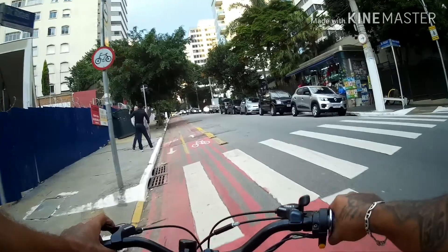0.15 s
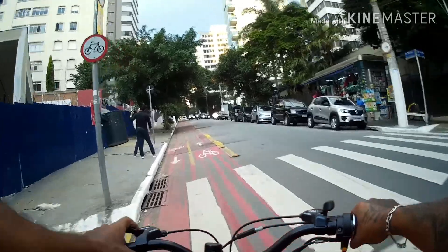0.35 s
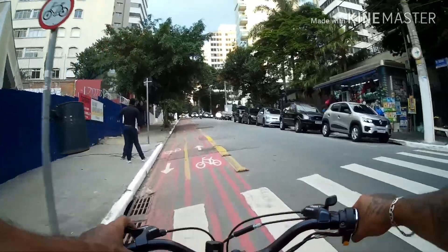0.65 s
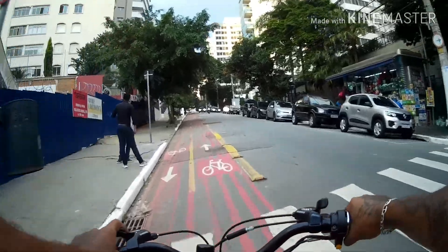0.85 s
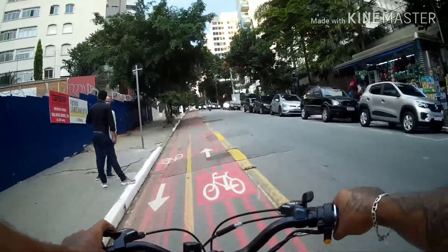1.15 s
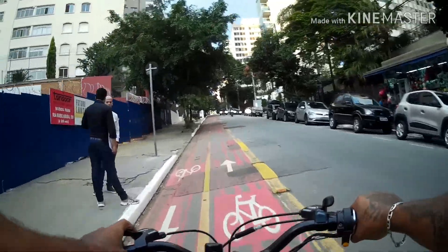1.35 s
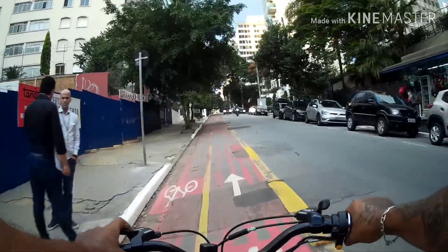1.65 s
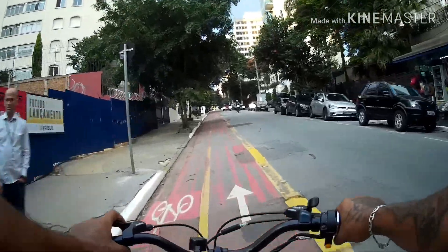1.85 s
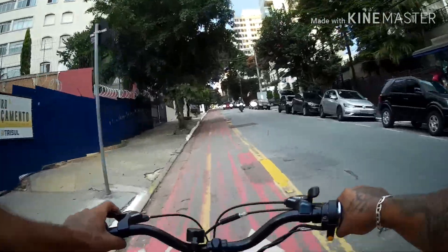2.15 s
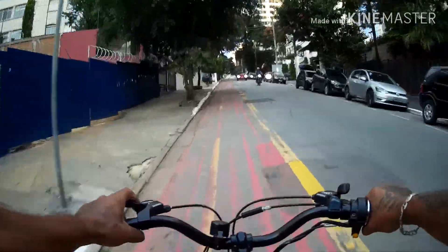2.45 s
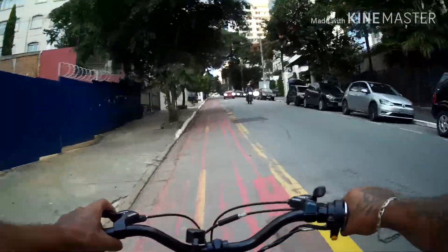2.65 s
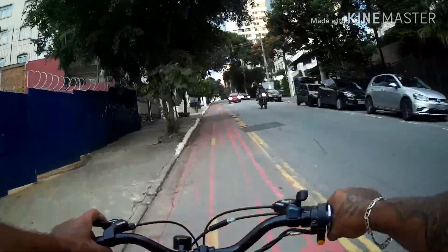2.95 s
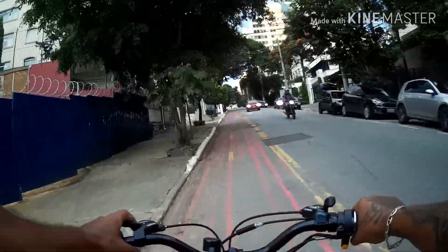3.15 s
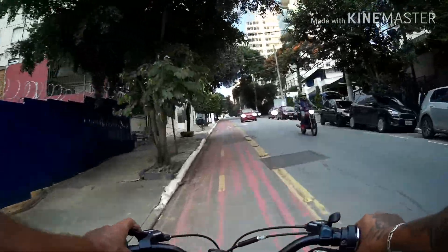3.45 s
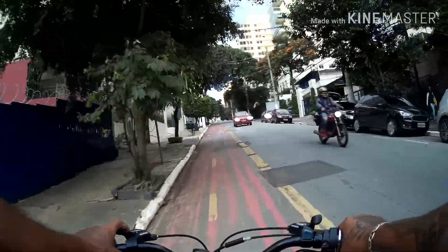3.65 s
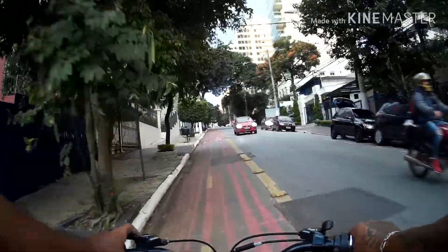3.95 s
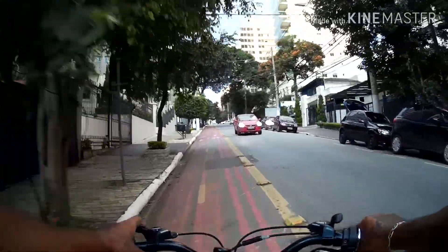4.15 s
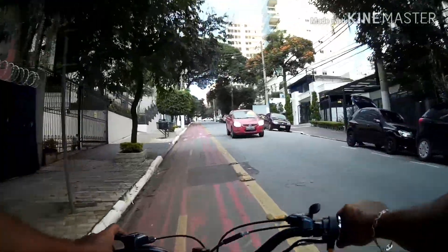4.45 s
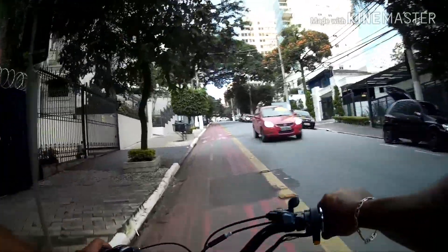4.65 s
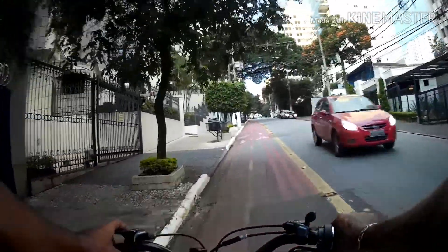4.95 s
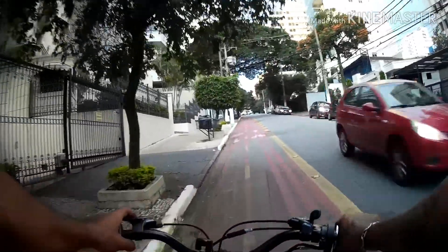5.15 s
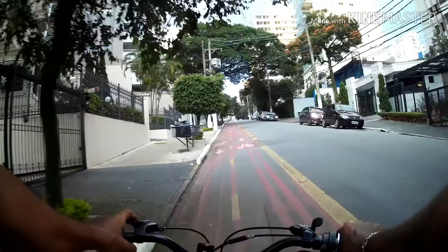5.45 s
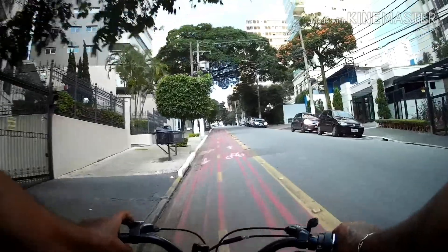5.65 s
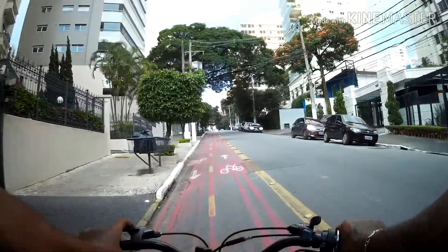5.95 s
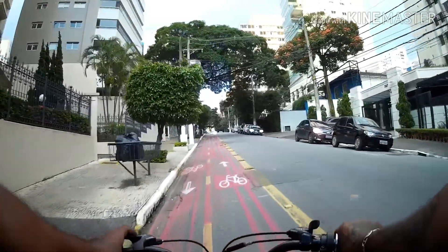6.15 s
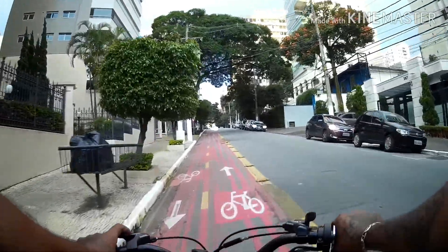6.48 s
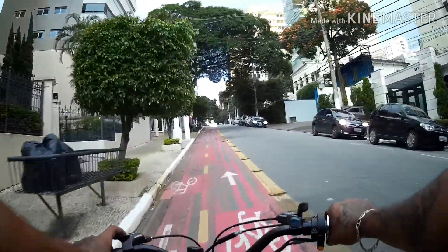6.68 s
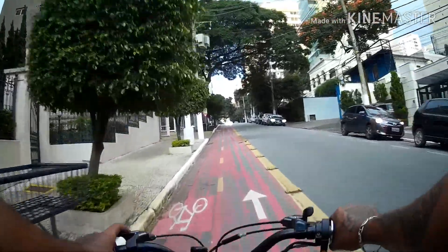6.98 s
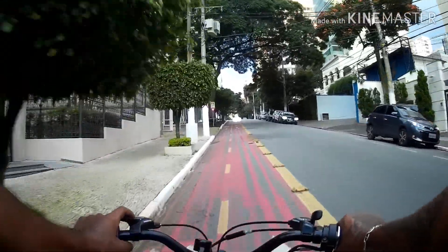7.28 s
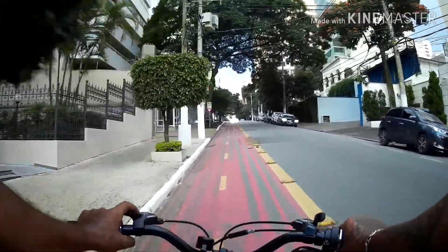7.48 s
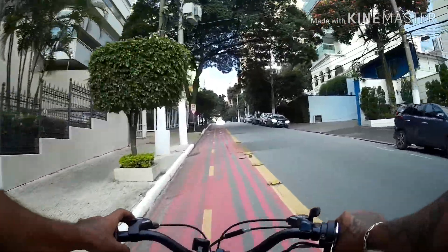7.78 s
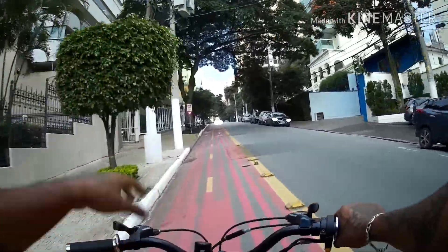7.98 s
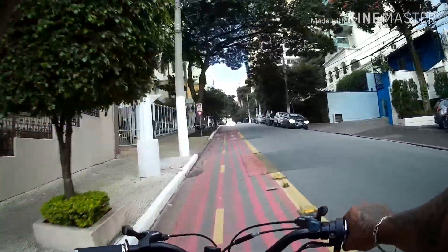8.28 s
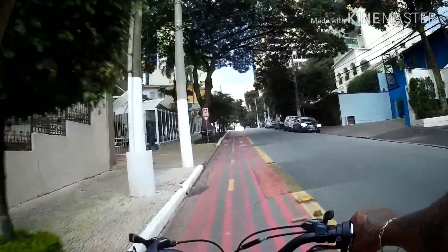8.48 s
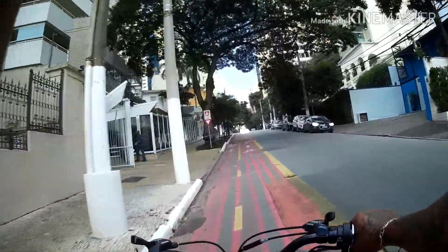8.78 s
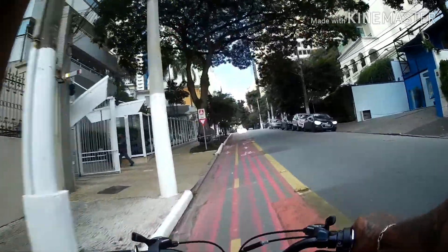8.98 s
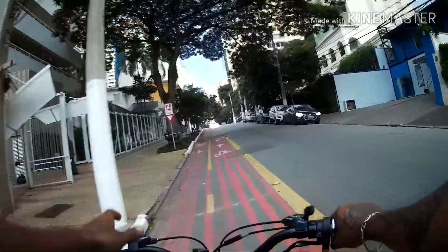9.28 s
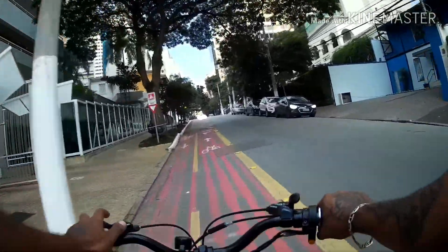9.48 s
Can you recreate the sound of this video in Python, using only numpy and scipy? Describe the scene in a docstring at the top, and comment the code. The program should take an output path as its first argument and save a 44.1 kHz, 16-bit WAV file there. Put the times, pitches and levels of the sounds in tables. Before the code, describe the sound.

A small four-stroke engine on a bicycle putters, gathers speed and settles into a rattling drone as a motorcycle and then a car pass.

```python
"""A small four-stroke engine drives a bicycle along a city street, heard from a camera on the rider.
It sets out slowly and gathers speed: each cycle pushes air, rings the muffler and clatters the valves.
All along the drive rasps, loose parts rattle, and tyres and air rumble; early on a part hums briefly.
Then a motorcycle comes by the other way, its exhaust falling in pitch, and after it a car.
By then the engine is cruising, and it runs on to the end."""
import sys
import numpy as np
from scipy import signal
from scipy.fft import rfft, irfft
from scipy.io import wavfile
from scipy.ndimage import uniform_filter1d

SR = 44100
rng = np.random.default_rng(int(sys.argv[2]) if len(sys.argv) > 2 else 0)


def put_to_file(sound):
    """Save the sound as 16-bit audio at rate SR, in the file named by the first command-line argument."""
    columns = np.atleast_2d(sound).T  # one column per channel
    safe = np.clip(columns, -1, 1)
    whole_steps = np.round(safe * 32767)
    wavfile.write(sys.argv[1], SR, whole_steps.astype(np.int16))


N = 424241
TIME = np.arange(N) / SR  # seconds
SLOW_HZ, CRUISE_HZ = 30.9, 36.56  # firings per second at the start and at cruise
CRUISE_DB = -29  # engine effort at cruise


def amp(db):
    """Decibels to gain."""
    return 10 ** (np.asarray(db) / 20)


def evened(x):
    """Scales to rms 1."""
    return x / np.sqrt(np.mean(x ** 2) + 1e-20)


def noise():
    """White noise for the whole scene."""
    return rng.standard_normal(N)


def curves(rows):
    """Each column of a time table, joined by straight lines."""
    s, *columns = np.transpose(rows)
    return [np.interp(TIME, s, column) for column in columns]


def wander(rate_hz):
    """Slow random drift of rms 1, with little movement faster than rate_hz."""
    count = 2048  # points of the drift, made at audio rate and then stretched over the scene
    hz = np.fft.rfftfreq(N, 1 / SR)[:count // 2 + 1]
    lowpass = 1 / (1 + (hz / rate_hz) ** 4)
    slow = irfft(rfft(rng.standard_normal(count)) * lowpass)
    return evened(np.interp(np.linspace(0, count - 1, N), np.arange(count), slow))


def colour(x, points, size=8192):
    """Passes x through a body with this spectrum, which rings only after it is struck; rms 1."""
    f, db = np.transpose(points)
    hz = abs(np.fft.fftfreq(size, 1 / SR))
    log_gain = np.log(amp(np.interp(np.log(hz + 1), np.log(f + 1), db)))
    # minimum phase: the phase follows from the gain
    spectrum = np.exp(np.conj(signal.hilbert(log_gain)))
    ring = np.fft.ifft(spectrum).real[:size // 2]
    return evened(signal.oaconvolve(x, ring)[:N])


def resonate(x, hz, width_hz):
    """One ringing mode, scaled to rms 1."""
    pole = np.exp((2j * np.pi * hz - np.pi * width_hz) / SR)
    return evened(signal.lfilter([1], [1, -pole], x).real)


def per_cycle(turns, spread_db):
    """A random gain that holds for one engine cycle."""
    cycle = np.floor(turns - np.floor(turns[0])).astype(int)
    return amp(spread_db * rng.standard_normal(1024))[cycle % 1024]


def burst(turns, length):
    """An envelope that jumps once a cycle and dies away; length in cycles."""
    return np.exp(-(turns % 1) / length)


def teeth(turns, alike, count=1200):
    """The same teeth meet in every cycle, so part of the grain repeats."""
    tooth = (turns % 1 * count).astype(int)
    same = rng.standard_normal(count)[tooth]
    return np.sqrt(alike) * same + np.sqrt(1 - alike) * noise()


def orders(table, load, waver_db):
    """Each order with its peak gain, which shifts with engine speed and wavers."""
    for k, *db in table:
        level_db = np.interp(load, [0, .6, 1], db) + waver_db * wander(rate_hz=13.5)
        yield round(k), np.sqrt(2) * amp(level_db)


def follow(effort_db, speed, cruise_db, per_db, per_hz, unsteady_db):
    """Gain of one engine part: it follows effort and speed, and is never quite steady."""
    from_effort = per_db * (effort_db - CRUISE_DB)
    from_speed = per_hz * (speed - CRUISE_HZ)
    return amp(cruise_db + from_effort + from_speed + unsteady_db * wander(rate_hz=14.0))


def bark(turns, speed, load, ring_hz=510, half_width_hz=85):
    """Each firing rings the muffler for a few milliseconds, sweeping quickly up, with weaker pulses between."""
    # orders that ring in the muffler:
    # (order, level when slow [dB], level midway [dB], level at cruise [dB])
    bark_orders = [(11, -20, -13, -14), (12, -8, -15, -14), (13, -7, -4, -4), (14, -19, -6, -5),
                   (15, -8, -7, -17), (16, -6, -7, -12), (17, -9, -11, -11), (18, -10, -16, -16),
                   (19, -13, -17, -12.5), (20, -18, -20, -19), (21, -18, -20, -22), (22, -19, -17, -25),
                   (23, -25, -21, -31), (25, -19, -24, -31)]
    turns = turns + .001 * wander(rate_hz=25)  # slightly uneven timing
    out = np.zeros(N)
    for k, gain in orders(bark_orders, load, waver_db=.5):
        detune = (k * speed - ring_hz) / half_width_hz
        # the phase of a resonance, with the orders below it leaving the pipe well ahead
        lag = np.arctan(detune) + np.where(detune < 0, .5, .16) * detune ** 2
        lag += .6 * np.sin(2 * np.pi * k * .36)  # the pulses between
        out -= gain * np.cos(2 * np.pi * k * turns - lag)
    return out * per_cycle(turns, spread_db=0.5)


def boom(turns, load):
    """Exhaust and intake push air; the pipe delays each order differently: the lowest thump, the rest drone."""
    # low orders of the firing cycle:
    # (order, level when slow [dB], level midway [dB], level at cruise [dB])
    boom_orders = [(1, -3, -5, -6.5), (2, 3, -0.5, -3.5), (3, -2.5, -4, -6), (4, -9.5, -6.5, -5),
                   (5, -3, -7, -3), (6, -4, -6.5, -7), (7, -1.5, -9, -12.5), (8, -12.5, -13, -19.5),
                   (9, -5, -11, -31.5), (10, -8, -10.5, -14.5)]
    out = np.zeros(N)
    for k, gain in orders(boom_orders, load, waver_db=0.43):
        lag = .09 * (k + 1) + .2 * (k - 4) ** 2  # in cycles of this order
        lag -= .2 * np.exp(-2 * (k - 2) ** 2)
        out += gain * np.cos(2 * np.pi * (k * turns - lag))
    return out


def puff(turns, load):
    """Turbulent gas follows each firing, through a muffler that sounds harder as the engine speeds up."""
    # the muffler under soft pulses: (frequency [Hz], relative level [dB])
    muffler_soft = [(150, -21), (335, -39), (395, 9), (440, -5), (490, 6), (560, 0), (650, -7), (770, 0),
                    (950, -28), (1500, -23), (3000, -79)]
    # the muffler under hard pulses: (frequency [Hz], relative level [dB])
    muffler_hard = [(150, -12.5), (300, -9.5), (490, 3.5), (560, 4.5), (640, -1.5), (760, 0), (1000, -9),
                    (1400, -25.5), (3000, -79.5)]
    flow = .45 + burst(turns, length=.6) * per_cycle(turns, spread_db=1.8)
    gas = flow * noise()
    soft, hard = colour(gas, muffler_soft), colour(gas, muffler_hard)
    return amp(-8) * ((1 - load) * soft + load * hard)


def drive(turns, snatch_at=0.41, trim_db=-2.5):
    """The chain rasps, most when each power stroke pulls it tight."""
    # pull on the chain as its rasp before the trim, swelling about once a wheel turn:
    # (time [s], level [dB])
    chain_pull = [(0.0, -50.5), (0.18, -57), (0.3, -48.5), (0.72, -52.5), (1.08, -55.0), (1.38, -45.5),
                  (1.62, -55), (1.8, -48), (2.04, -53), (2.16, -48.0), (2.52, -51), (2.7, -45),
                  (2.94, -47.5), (3.18, -43.5), (3.36, -49), (3.6, -44), (3.78, -52.0), (3.9, -43.5),
                  (4.14, -44), (4.2, -50), (4.44, -46.5), (4.62, -48.5), (4.74, -42.0), (5.22, -49),
                  (5.4, -51), (5.58, -46.0), (5.64, -51), (5.82, -47), (6.3, -52), (6.6, -46.5),
                  (6.84, -49.5), (7.14, -48.5), (7.2, -51.0), (7.5, -48), (7.62, -49.5), (7.68, -44),
                  (7.8, -47), (8.34, -45.5), (8.58, -50.5), (8.88, -48.0), (9.18, -48), (9.42, -54),
                  (9.48, -48), (9.6, -48)]
    # ring of the drive: (frequency [Hz], relative level [dB])
    drive_body = [(600, -32), (960, -17), (1100, -1.5), (1220, -1), (1290, .5), (1390, -12), (2200, -34),
                  (6000, -70)]
    snatch = turns - snatch_at  # place in the cycle
    pull = .42 + burst(snatch, length=.33) * per_cycle(snatch, spread_db=1.0)
    rasp = colour(pull * teeth(turns, alike=.42), drive_body)
    return amp(curves(chain_pull)[0] + trim_db) * rasp


def clatter(turns, grind=0.45, trim_db=4.5):
    """Valve knocks over the steady grinding of the gears shake the casing and its fins."""
    # the clatter before the trim: (time [s], level [dB])
    clatter_level = [(0.0, -53.5), (0.9, -57.5), (2.16, -54.0), (2.34, -56), (2.46, -52), (2.76, -52.0),
                     (2.88, -49.0), (3.3, -51.5), (3.48, -49), (3.66, -54.5), (3.96, -47.5), (4.32, -49.5),
                     (4.5, -52.5), (4.62, -47.5), (4.92, -47.5), (5.4, -49.5), (5.58, -46.5), (6.3, -53.0),
                     (6.6, -48), (6.72, -50), (7.38, -48.5), (7.98, -51), (8.28, -48.5), (8.64, -52),
                     (8.82, -49), (9.6, -50)]
    # knocks of the valve gear: (place in the cycle [0-1], decay [cycles], relative level [dB])
    valves = [(0.362, 0.16, -11), (0.551, 0.029, -15), (.72, 0.069, -19)]
    # the engine casing: (frequency [Hz], relative level [dB])
    casing = [(300, -36.5), (650, 7.5), (880, 10), (1020, 6), (1140, -8), (1450, 1.5), (1620, 0),
              (1780, 0.5), (1950, -3), (2150, -8.5), (2480, -12), (2800, -18), (3300, -25), (9000, -53)]
    # cooling fins that ring with the knocks: (frequency [Hz], width [Hz], relative level [dB])
    fins = [(1771, 10, -20), (3710, 80, -35), (4250, 80, -30.5)]
    knocks = np.zeros(N)
    for at, length, db in valves:
        knocks += amp(db) * burst(turns - at, length) * per_cycle(turns - at, spread_db=3.8)
    force = (grind + knocks) * teeth(turns, alike=.3)
    shaken = colour(force, casing)
    for hz, width_hz, db in fins:
        shaken += amp(db) * resonate(force, hz, width_hz)
    return amp(curves(clatter_level)[0] + trim_db) * shaken


def rattle(turns, at=0.27, trim_db=-6):
    """Thin loose parts buzz after each power stroke."""
    # the rattle before the trim: (time [s], level [dB])
    rattle_level = [(0.0, -56), (0.3, -63), (0.66, -63.0), (0.78, -68), (1.14, -66), (1.32, -60),
                    (1.56, -63), (2.64, -63), (2.88, -58.5), (3.78, -60), (3.96, -53), (4.5, -62),
                    (4.74, -51), (5.4, -65), (5.64, -56.5), (6.3, -67), (6.42, -63), (7.02, -57),
                    (7.14, -69), (7.44, -55), (7.98, -62), (8.22, -52.5), (8.4, -58), (8.64, -57),
                    (8.76, -52), (9.6, -59.0)]
    # ring of the thin parts, with a bright hiss above 3 kHz that swells along with them: (frequency [Hz],
    # relative level [dB])
    loose_parts = [(1200, -33), (1900, 1), (2120, -2.5), (2260, 3), (2520, 2), (2850, -11), (3400, -18),
                   (6000, -19), (12000, -22.5), (15000, -36)]
    force = (.4 + burst(turns - at, length=.3)) * teeth(turns, alike=.3)
    return amp(curves(rattle_level)[0] + trim_db) * colour(force, loose_parts)


def hum(middle_s=1.47, length_s=.14, hz=393, db=-37):
    """A part of the bicycle hums briefly: one resonance swells and dies away."""
    swell = np.cos(np.pi * np.clip((TIME - middle_s) / length_s, -.5, .5))
    return amp(db) * swell * np.sqrt(2) * np.sin(2 * np.pi * hz * TIME)


def passing(path, tone, flutter=0.0081):
    """Another vehicle's exhaust: a few orders of a fluttering pitch, swelling and fading along its path."""
    hz, db = curves(path)
    turns = np.cumsum(hz * (1 + flutter * wander(rate_hz=5.5))) / SR
    present = 1. * (TIME > path[0][0]) * (TIME < path[-1][0])
    near = uniform_filter1d(present, size=4000)  # soft ends
    exhaust = sum(amp(d) * np.cos(2 * np.pi * round(k) * turns) for k, d in tone)
    return near * amp(db) * evened(exhaust)


def motorcycle():
    """An oncoming motorcycle's exhaust falls in pitch as it goes by."""
    # its way past the microphone: (time [s], exhaust pitch [Hz], level [dB])
    motorcycle_path = [(3.3, 29.5, -60), (3.7, 29.2, -43), (4.05, 28.3, -37), (4.3, 26, -42),
                       (4.8, 24.5, -60)]
    # its exhaust tone: (order, relative level [dB])
    motorcycle_tone = [(3, -3), (4, 0), (5, -8), (6, -7)]
    return passing(motorcycle_path, motorcycle_tone)


def car():
    """An oncoming car's lower orders fall in pitch as it goes by, then shift as it fades."""
    # its way past the microphone: (time [s], exhaust pitch [Hz], level [dB])
    car_path = [(4.8, 65.6, -49), (5.2, 65.2, -32.5), (5.45, 61.7, -33), (5.65, 58.8, -33),
                (5.95, 57.3, -36), (6.3, 57.5, -44), (7.3, 61, -49), (8.2, 59, -58)]
    # its exhaust tone: (order, relative level [dB])
    car_tone = [(1, 5.5), (2, -1), (3, -8), (5, -24)]
    return passing(car_path, car_tone)


def road(trim_db=-6, bumpy_db=3.1, bumpy_rate_hz=8.9):
    """The tyres roar, swelling at random over uneven asphalt."""
    # roar before the trim, following the roughness of the asphalt: (time [s], level [dB])
    roughness = [(0.0, -35.5), (1.2, -41.0), (1.5, -33.0), (1.62, -37.5), (1.68, -34.5), (1.98, -38.5),
                 (2.16, -33.0), (2.58, -32.0), (2.64, -35.0), (3.18, -36.5), (3.48, -34.5), (3.72, -37.5),
                 (4.08, -34.0), (4.62, -35.0), (4.74, -31.0), (5.16, -33.5), (5.28, -31.0), (5.46, -33.5),
                 (5.82, -31.0), (6.0, -36.0), (6.36, -37.0), (6.6, -31.5), (6.9, -35.5), (7.38, -34.0),
                 (7.56, -30.5), (7.68, -34.0), (8.04, -36.0), (8.22, -33.0), (8.58, -37.0), (8.7, -32.5),
                 (9.36, -34.5), (9.6, -33.5)]
    # tyre roar: (frequency [Hz], relative level [dB per Hz])
    tyre_roar = [(100, -10), (200, -8), (290, 1.5), (345, -2), (400, -4), (500, -1), (620, -9.5),
                 (900, -16.5), (1500, -32.5), (3000, -50.5), (8000, -65)]
    level_db = curves(roughness)[0] + trim_db + bumpy_db * wander(bumpy_rate_hz)
    return amp(level_db) * colour(noise(), tyre_roar)


def air(speed, cruise_db=-41, per_hz=.5, gust_db=2):
    """Air passing the microphone rumbles in gusts, more as the bicycle goes faster."""
    # passing air: (frequency [Hz], relative level [dB per Hz])
    air_rumble = [(5, 2), (16, -6), (45, 1), (120, -4.5), (220, -6), (300, -5), (600, -24), (3000, -73)]
    level_db = cruise_db + per_hz * (speed - CRUISE_HZ) + gust_db * wander(rate_hz=4.8)
    return amp(level_db) * colour(noise(), air_rumble)


def hiss(db=-63.5):
    """A steady hiss of coloured noise lies under everything."""
    # the hiss: (frequency [Hz], relative level [dB per Hz])
    hiss_colour = [(100, 8), (3000, 2.5), (5000, 0), (7000, 0.5), (9000, -1.5), (12000, 0.5), (13300, -3),
                   (14500, -12), (15400, -35)]
    return amp(db) * colour(noise(), hiss_colour)


def scene():
    """All engine parts follow one crankshaft, whose speed hunts a little about its course."""
    # engine speed: (time [s], firing rate [firings per second])
    engine_speed = [(0.0, 30.81), (0.08, 28.92), (0.32, 30.34), (0.4, 29.42), (0.64, 30.9), (0.8, 28.47),
                    (0.88, 29.97), (1.2, 30.1), (1.28, 30.77), (1.52, 30.32), (1.68, 30.98), (1.92, 30.96),
                    (2.16, 32.86), (2.24, 29.35), (2.56, 32.77), (2.72, 32.54), (3.12, 33.94), (3.36, 33.6),
                    (3.44, 34.79), (3.68, 34.41), (4.08, 35.63), (4.48, 35.45), (4.72, 37.2), (4.8, 36.19),
                    (5.04, 36.76), (5.28, 36.18), (5.52, 37.61), (5.76, 37.11), (5.84, 36.63),
                    (5.92, 37.71), (6.0, 36.8), (7.04, 36.89), (7.36, 37.48), (8.32, 37.36), (8.88, 37.96),
                    (8.96, 36.86), (9.04, 38.03), (9.28, 36.88), (9.44, 37.96), (9.6, 36.72)]
    # how hard the engine pulls, which sets its bark, boom and gas: (time [s], effort [dB])
    engine_effort = [(0.0, -34.5), (0.3, -33), (0.42, -36), (0.48, -39.5), (0.66, -39.5), (0.9, -41.5),
                     (1.14, -39), (1.32, -34.5), (2.1, -32), (2.28, -32.5), (2.52, -33.5), (2.76, -29.5),
                     (3.24, -30.5), (3.42, -29), (3.72, -33), (3.9, -29), (4.2, -30.5), (4.74, -27.5),
                     (5.4, -31), (5.7, -26.5), (6.24, -32), (6.54, -29), (7.2, -30), (7.38, -27.5),
                     (7.92, -30), (8.16, -27.5), (8.64, -31), (8.82, -27), (9.0, -29.5), (9.6, -28.5)]
    course, effort_db = curves(engine_speed)[0], curves(engine_effort)[0]
    hunt_hz, hunt_rate_hz = 0.036, 3.7  # size and rate of the hunting
    hunt = hunt_hz / (2 * np.pi * hunt_rate_hz) * wander(hunt_rate_hz)  # cycles ahead or behind
    turns = np.cumsum(course) / SR + hunt + .354  # engine cycles
    speed = uniform_filter1d(course, size=24000)  # smoothed over about half a second
    load = np.clip((speed - SLOW_HZ) / (CRUISE_HZ - SLOW_HZ), 0, 1)  # 0 slow, 1 cruising

    bark_gain = follow(effort_db, speed, cruise_db=-31.5, per_db=1, per_hz=0, unsteady_db=0.21)
    boom_gain = follow(effort_db, speed, cruise_db=-32, per_db=0.44, per_hz=0.86, unsteady_db=0.63)
    puff_gain = follow(effort_db, speed, cruise_db=-34.5, per_db=.6, per_hz=.4, unsteady_db=.7)
    engine = bark_gain * bark(turns, course, load)
    engine += boom_gain * boom(turns, load)
    engine += puff_gain * puff(turns, load)
    bicycle = drive(turns) + clatter(turns) + rattle(turns) + hum()
    street = motorcycle() + car() + road() + air(speed)
    return (engine + bicycle + street + hiss())[None]


def record(dry):
    """The camera's band limit: a steep lowpass."""
    lowpass = signal.firwin(511, 15200, window=("kaiser", 9), fs=SR)  # edge in Hz
    return signal.oaconvolve(dry, lowpass[None], "same")


dry = scene()
out = record(dry)
put_to_file(out)
```